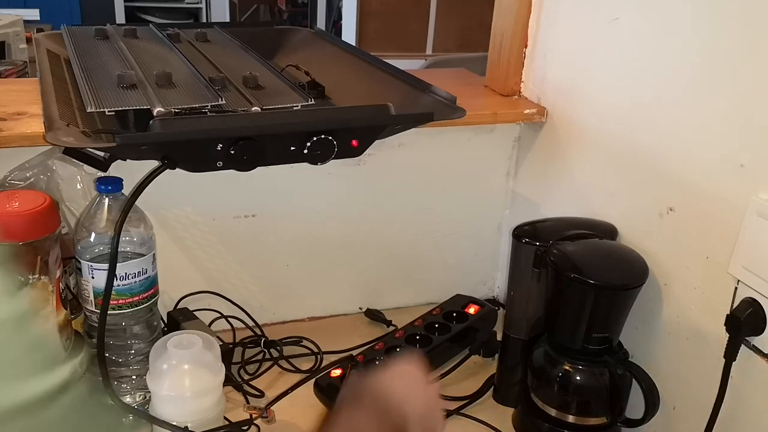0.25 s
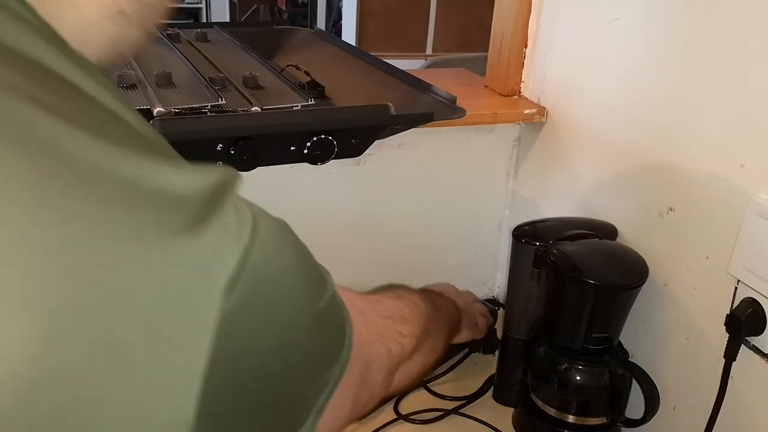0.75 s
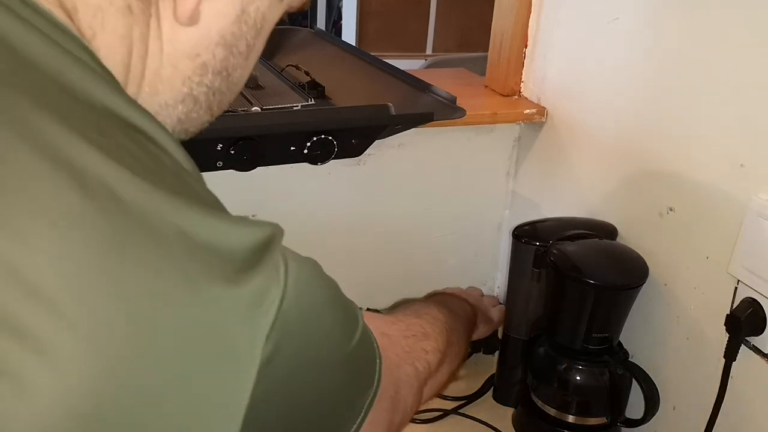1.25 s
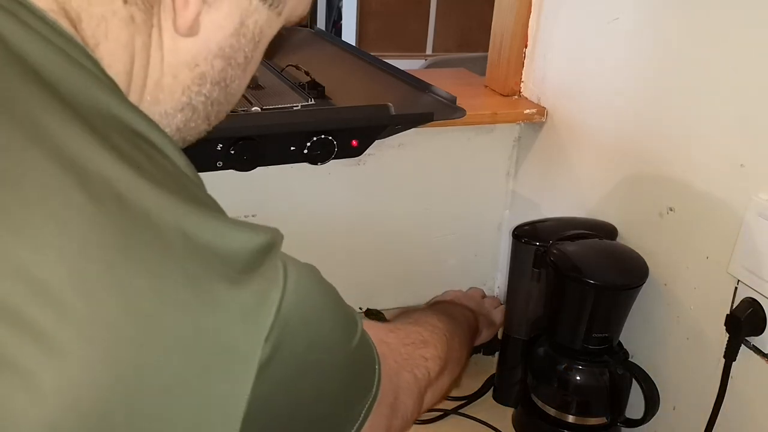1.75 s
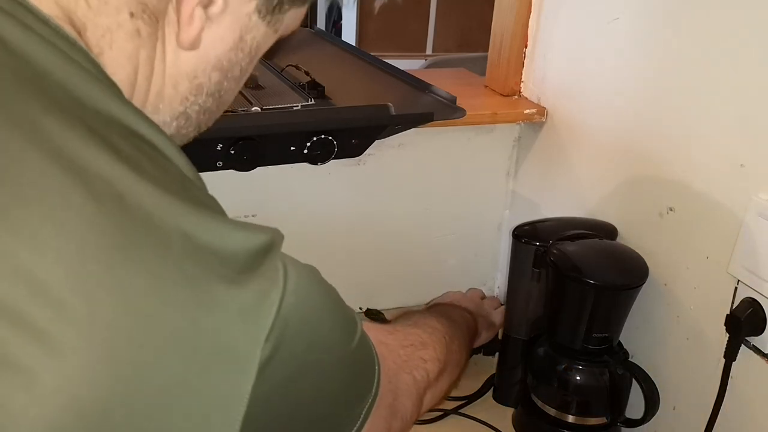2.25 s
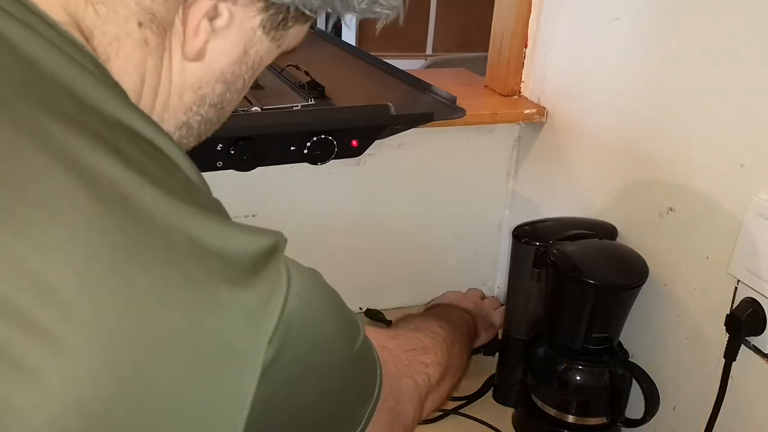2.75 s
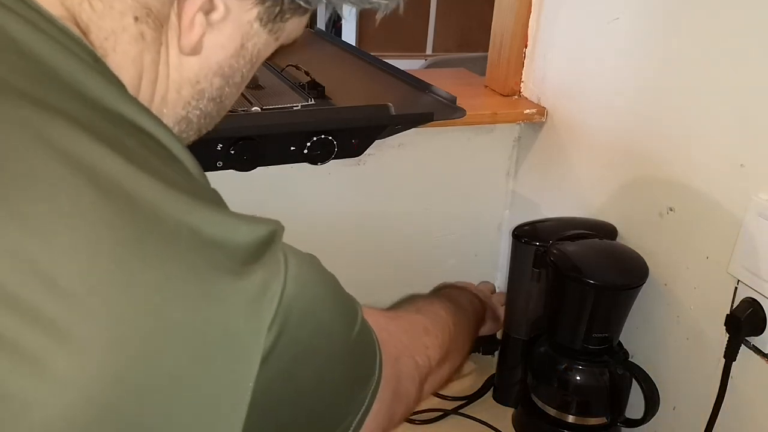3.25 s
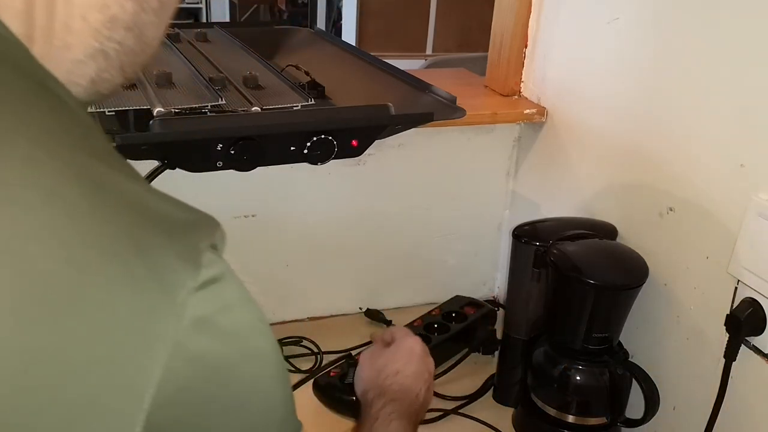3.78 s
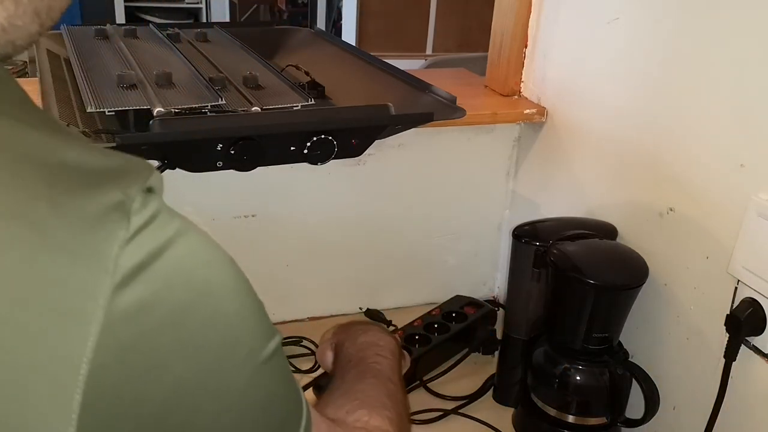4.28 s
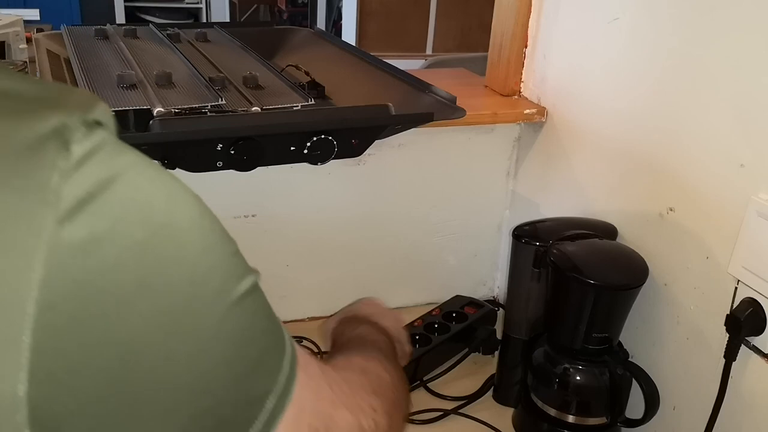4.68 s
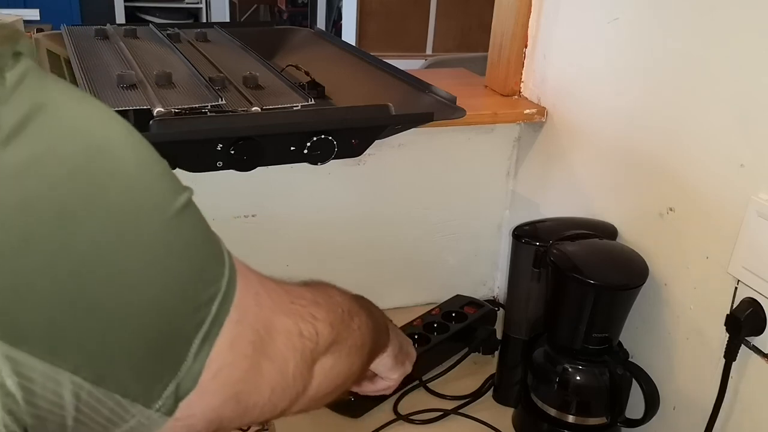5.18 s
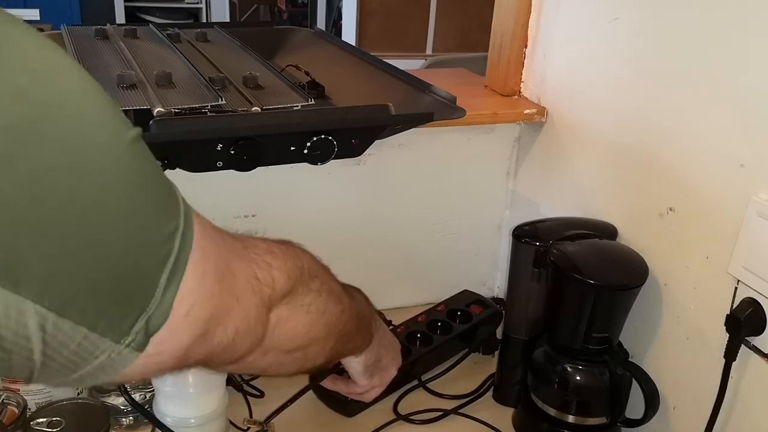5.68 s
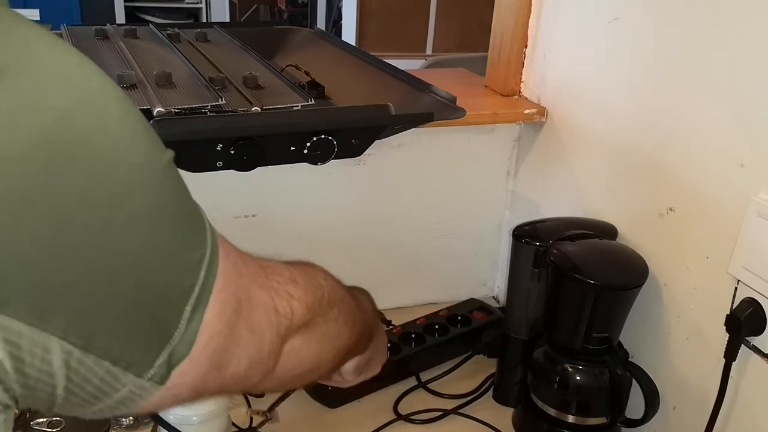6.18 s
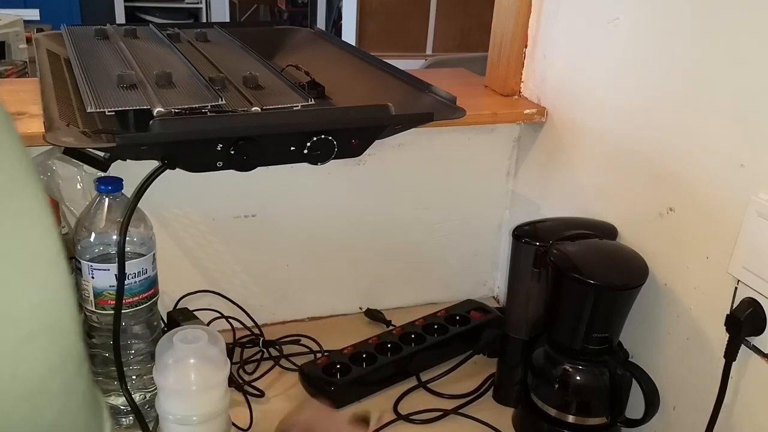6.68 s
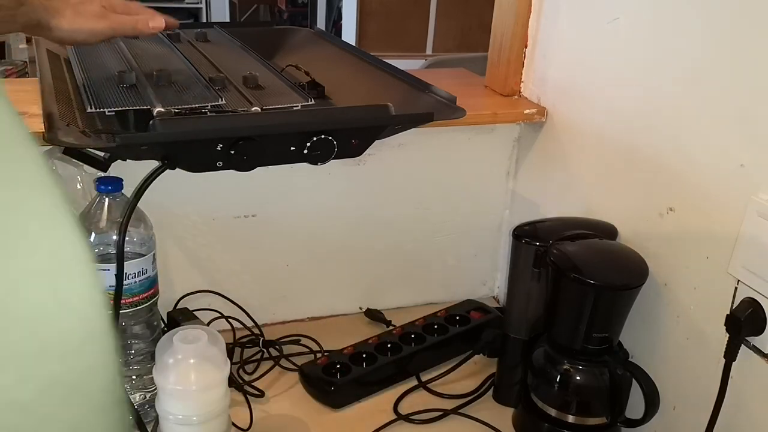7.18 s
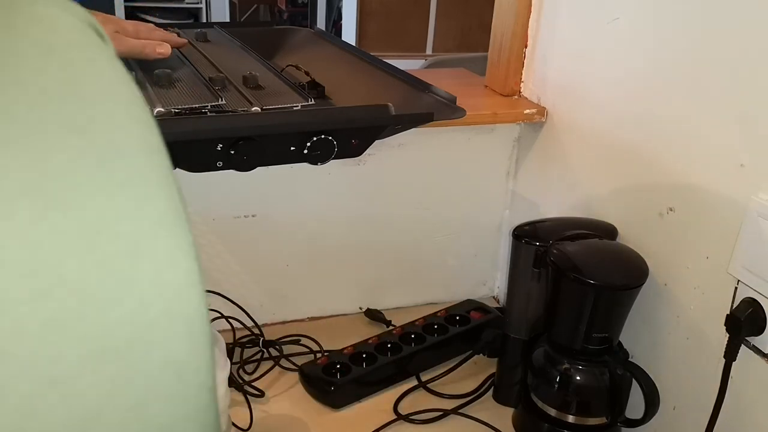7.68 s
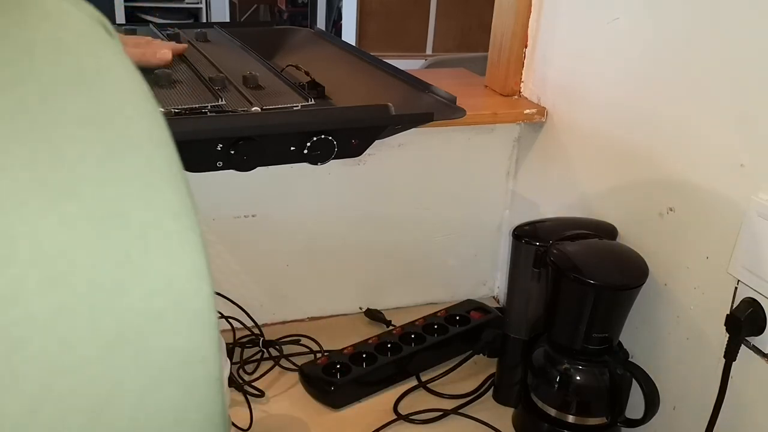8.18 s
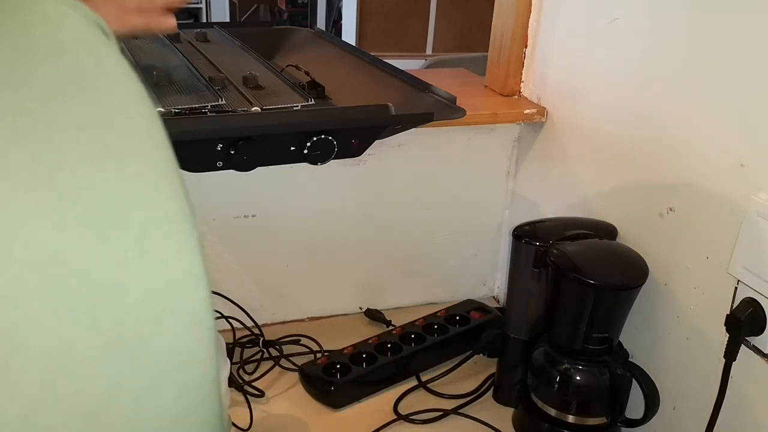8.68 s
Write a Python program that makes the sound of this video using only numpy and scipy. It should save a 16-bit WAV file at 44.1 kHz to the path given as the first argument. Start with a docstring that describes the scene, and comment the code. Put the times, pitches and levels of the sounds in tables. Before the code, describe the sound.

A heater relay ticks at once, then a hand bumps and briefly scrapes a plastic power strip on a wooden counter. After quiet ticks, a switch clicks and the plastic knocks. Softer clicks follow, then the loudest sharp snap with a woody thump. Clothes rustle, a knock sounds, and fingers lightly brush a metal grille. Close phone microphone, small lively room, faint low rumble.

```python
"""Clicks, knocks and scrapes in a quiet kitchen corner, with rustling clothes and a faint rumble. A hand works
the switches and plugs of a plastic power strip on a wooden counter; the relay of an electric heater ticks, the
hand taps the heater's case and brushes its metal grille. Each blow is shaped noise that makes a body ring.
Drags are random jerks through a resonance, cloth and hush are coloured noise, and hum is steady tones. Echoes
and a fading tail make the room; the phone's microphone port lifts the treble near 10 kHz."""
import sys
import numpy as np
from scipy import signal
from scipy.fft import rfft, irfft
from scipy.io import wavfile
from scipy.ndimage import uniform_filter1d

SR = 44100
rng = np.random.default_rng(int(sys.argv[2]) if len(sys.argv) > 2 else 0)


def unload_audio(sound):
    """Save the sound as a 16-bit wav file, at the path given as the first command line argument."""
    columns = np.transpose(np.atleast_2d(sound))
    # keep every value between -1 and 1, then stretch to whole-number steps
    steps = np.round(np.clip(columns, -1, 1) * 32767)
    wavfile.write(sys.argv[1], SR, steps.astype(np.int16))


N = 393813

# the pitch bands that make up a blow, treble to bass: low edge f/Hz, high edge f/Hz
PART_EDGES_HZ = [(10500, 14000), (7500, 10500), (5200, 7500), (3600, 5200), (2500, 3600), (1800, 2500),
                 (1250, 1800), (850, 1250), (550, 850), (350, 550), (150, 350), (70, 150)]


def undb(db):
    """Turn decibels into a gain."""
    return 10 ** (np.asarray(db) / 20)


def unit(x):
    """Scale to an average (rms) level of 1."""
    return x / np.sqrt(np.mean(x ** 2))


def band(x, lo_hz, hi_hz, order=2):
    """Keep the pitches between two limits."""
    return signal.sosfilt(signal.butter(order, [lo_hz, hi_hz], "band", fs=SR, output="sos"), x)


def ring(x, hz, width_hz):
    """One resonance, with gain 1 at its centre; the narrower it is, the longer it rings."""
    return signal.lfilter(*signal.iirpeak(hz, hz / width_hz, fs=SR), x)


def curve(rows):
    """Gain over time from (t/s, level/dB) rows, practically silent outside them."""
    s, db = np.transpose(rows)
    return undb(np.interp(np.arange(N) / SR, s, db, left=-200, right=-200))


def swells(rows):
    """Each (start, peak, end, level) row climbs from far below its level to a peak and sinks back."""
    depth_db = 30
    gain = 0
    for start, peak, end, db in rows:
        gain = gain + curve([(start, db - depth_db), (peak, db), (end, db - depth_db)])
    return gain


def noise(points):
    """Noise of rms 1, coloured by (f/Hz, level/dB) points and silent below the first."""
    hz, db = np.transpose(points)
    bins = np.fft.rfftfreq(N, 1 / SR)
    gain = undb(np.interp(np.log(bins + 1), np.log(hz), db)) * (bins > hz[0])
    return unit(irfft(rfft(rng.standard_normal(N)) * gain, N))


def walk(rate):
    """Slow random wandering: 'rate' random levels a second, held and then smoothed twice."""
    hold = int(SR / rate)
    steps = np.repeat(rng.standard_normal(N // hold + 1), hold)
    return uniform_filter1d(uniform_filter1d(steps, hold), hold)[:N]


def hush():
    """Room hush that sways a little, plus steady microphone hiss; both are coloured noise."""
    # colour of the room hush: f/Hz, level per Hz/dB (relative)
    hush_colour = [(19, -33.5), (32, -11), (71, -20), (112, -30), (146, -27.5), (255, -34.5), (280, -48.5),
                   (348, -40), (382, -38.5), (1300, -53), (1690, -87), (2860, -120)]
    # colour of the hiss: f/Hz, level per Hz/dB (relative)
    hiss_colour = [(760, -34), (1300, -1), (2710, -4), (3140, -5.5), (5480, -5.5), (11000, -4.5),
                   (16000, -9)]
    hush_db, hiss_db = -60, -78
    room_hush = undb(hush_db + 1.2 * walk(3.2)) * noise(hush_colour)
    return room_hush + undb(hiss_db) * noise(hiss_colour)


def hum():
    """Faint steady tones of an appliance: sine waves whose level wavers slightly."""
    # the tones: f/Hz, middle rms level/dB
    tones = [(148, -77), (350, -84.5)]
    t = np.arange(N) / SR
    total = 0
    for hz, db in tones:
        level = np.sqrt(2) * undb(db + walk(6.8))  # a sine peaks at root 2 times its rms
        total = total + level * np.sin(2 * np.pi * hz * t)
    return total


def rumble():
    """Air and building rumble at the lowest audible pitch: a sine with wandering pitch and level."""
    middle_hz, wander_hz = 19.9, 1.9  # the wander settings scale a random walk
    middle_db, swell_db, swells_per_s = -53.5, 7.5, 5
    phase = 2 * np.pi * np.cumsum(middle_hz + wander_hz * walk(13)) / SR
    return np.sqrt(2) * undb(middle_db + swell_db * walk(swells_per_s)) * np.sin(phase)


def rustle():
    """Cloth rubbing on cloth and skin: coloured noise that follows the movement and flutters."""
    # how loud the clothes are: t/s, level/dB
    movement = [(0, -63.5), (.55, -75), (.8, -69), (1.1, -77.5), (2.8, -84), (4.45, -79), (5.0, -82.5),
                (5.15, -75), (5.4, -78), (6.45, -78.5), (6.68, -58), (6.85, -69), (6.97, -63), (7.1, -68),
                (7.3, -65.5), (7.8, -84.5), (8.93, -82.5)]
    # colour of the cloth: f/Hz, level per Hz/dB (relative)
    cloth = [(710, -30), (1200, -6), (1520, -16.5), (2200, -9.5), (5530, -16), (9210, -1.5), (15200, -13),
             (16000, -18.5)]
    return curve(movement) * undb(2 * walk(19)) * noise(cloth)


def squeak():
    """A faint thin squeak that comes and goes: noise through a narrow resonance wavers like a tone."""
    # when it is heard: start t/s, peak t/s, end t/s, level/dB
    squeak_times = [(1.0, 1.26, 1.44, -77), (1.35, 1.62, 2.6, -81)]
    return unit(ring(rng.standard_normal(N), 2036, 40)) * swells(squeak_times)


def shuffle():
    """A hand shifting cables on the counter: dull noise with an uneven level."""
    # when they move: start t/s, peak t/s, end t/s, level/dB (an end before the start stays silent)
    shifts = [(4.5, 5.18, 5.83, -76), (5.46, 5.53, 4.3, -69), (5.62, 5.68, 5.8, -63), (5.77, 5.83, 5, -85)]
    rub = unit(band(rng.standard_normal(N), 220, 680, order=1)) * undb(8.7 * walk(30))
    return rub * swells(shifts)


def drag():
    """The strip dragged over the counter: uneven stick-slip jerks shake its hollow body."""
    # the drags: start t/s, peak t/s, end t/s, level of the ringing/dB, pitch f/Hz
    drags = [(.8, 0.833, 0.89, -32, 927), (5.85, 6.0, 6.12, -55.5, 720)]
    width_hz, slips_per_s = 130, 1500
    jerks = (rng.random(N) < slips_per_s / SR) * rng.standard_normal(N)
    slips = band(jerks, 350, 1500)
    total = 0
    for *row, hz in drags:
        shake = unit(ring(slips, hz, width_hz)) + undb(-11.5) * unit(slips)
        total = total + shake * swells([row])
    return total


def parts(snap_db, snap_hz, body_db, body_hz, thud_db):
    """Strength of each part, treble to bass: a snap on top, a hump at the body pitch, a thud below."""
    snap_fall_db = 6.5  # per octave to either side
    body_fall_db = 5.5  # one octave away, growing with the square of the distance
    thud_hz, thud_fall_db, thud_low_fall_db = 208, 8, 3.5  # falls per octave above and below
    octave = np.log2(np.prod(PART_EDGES_HZ, axis=1)) / 2  # middle of each part
    snap = snap_db - snap_fall_db * np.abs(octave - np.log2(snap_hz))
    body = body_db - body_fall_db * (octave - np.log2(body_hz)) ** 2
    above = octave - np.log2(thud_hz)
    thud = thud_db - np.maximum(thud_fall_db * above, -thud_low_fall_db * above)
    return 10 * np.log10(undb(snap) ** 2 + undb(body) ** 2 + undb(thud) ** 2)


def colour(part_db, size):
    """Filter that glides smoothly through the strength per Hz of each part and reacts without delay."""
    top_droop_db, bottom_droop_db = -8.5, -9.5  # at 16 kHz and 40 Hz, against the nearest part
    lo, hi = np.transpose(PART_EDGES_HZ[::-1])
    per_hz = part_db[::-1] - 10 * np.log10((hi - lo) / (SR / 2))
    hz = np.r_[40, np.sqrt(lo * hi), 16000]
    db = np.r_[per_hz[0] + bottom_droop_db, per_hz, per_hz[-1] + top_droop_db]
    bins = np.fft.rfftfreq(size, 1 / SR)
    log_gain = np.log(undb(np.interp(np.log(bins + 1), np.log(hz), db)))
    cepstrum = irfft(log_gain)[:size // 2]
    # folding the cepstrum gives minimum phase: the energy comes as early as it can
    return np.exp(2 * rfft(cepstrum, size) - cepstrum[0])


def contact_chatter(lasting_ms, size, rise_ms=1.3):
    """Many small contacts: one noise burst per blow, exciting all pitches about evenly."""
    ms = np.arange(size) / SR * 1000
    rise = 1 - np.exp(-(ms / rise_ms) ** 2)
    burst = rng.standard_normal((len(lasting_ms), size)) * np.exp(-ms / lasting_ms) * rise
    spectrum = rfft(burst)
    even = irfft(spectrum / np.abs(spectrum))  # same strength at every pitch
    chatter = even * np.exp(-ms / (3 * lasting_ms)) * rise
    energy = np.sum(chatter ** 2, axis=1, keepdims=True)
    return chatter / np.sqrt(energy / (lasting_ms * SR / 1000))


def blows(events, modes, size=8192):
    """Each blow is a burst of chatter, weighted from snap to thud; it also sets the body ringing."""
    thud_lag_s, thud_top_hz = .012, 252.3  # the bass of a blow blooms late
    events = np.array(events)
    chatter = contact_chatter(np.clip(events[:, -2:-1], .5, 60), size)
    bins = np.fft.rfftfreq(size, 1 / SR)
    late = np.exp(-2j * np.pi * thud_lag_s * thud_top_hz * np.arctan(bins / thud_top_hz))
    contact, push = np.zeros((2, N + size))
    for (s, *strength, _, ring_db), shake in zip(events, chatter):
        hit = irfft(rfft(shake) * colour(parts(*strength), size) * late)
        start = int(s * SR)
        contact[start:start + size] += hit
        push[start:start + size] += undb(ring_db) * hit
    ringing = sum(undb(db) * ring(push, hz, width) for hz, width, db in modes)
    return undb(-14) * (contact + ringing)[:N]


def grille():
    """The hand brushes the heater's metal grille: a few close blows ring its thin bars."""
    # blows: t/s, snap level/dB, snap f/Hz, body level/dB, body f/Hz, thud level/dB, chatter/ms, ring level/dB
    # (levels before the common 14 dB cut in blows)
    brushes = [(8.268, -53.5, 7000, -59, 1176, -62, 27.45, -2),
               (8.277, -52.5, 9500, -48, 850, -46, 28.5, -1.8),
               (8.312, -49, 4360, -43.5, 944, -47.5, 31.7, -2.2),
               (8.345, -54.5, 4500, -51.5, 950, -49, 60.8, .4)]
    # what rings: f/Hz, width/Hz, level over the broad sound/dB
    grille_modes = [(205, 12, 10), (662, 11, 15), (1850, 20, 9), (2250, 14, 10), (3140, 20, 8),
                    (4110, 10, 17), (4250, 14, 13), (4700, 16, 10), (5740, 16, 9), (6420, 12, 15),
                    (8020, 16, 12), (8980, 20, 12), (9320, 20, 10), (11500, 25, 8)]
    return blows(brushes, grille_modes)


def heater():
    """The heater's relay ticks and a hand taps its case once: small blows ring its housing."""
    # blows: t/s, snap level/dB, snap f/Hz, body level/dB, body f/Hz, thud level/dB, chatter/ms, ring level/dB
    # (levels before the common 14 dB cut in blows)
    ticks = [(.027, -37, 12000, -41.5, 2340, -46.5, 10, -3), (1.2444, -66, 9050, -62.5, 700, -79, 27, -18),
             (1.336, -45.5, 6660, -43, 760, -82, 19, 3), (1.82, -67, 10500, -74, 3000, -81, 11, -7),
             (2.997, -46.5, 7360, -46.5, 3300, -43, 3.2, -21),
             (7.222, -40.5, 6830, -43, 1700, -59, 27, -16)]
    # what rings: f/Hz, width/Hz, level over the broad sound/dB
    heater_modes = [(657, 30, 9), (2650, 60, 6), (4290, 60, 5), (6460, 90, 11), (7000, 90, 12),
                    (9850, 60, 8), (10150, 70, 9), (11300, 200, 7)]
    return blows(ticks, heater_modes)


def bumps():
    """Bumps of the strip and its plugs: blows with dull, broad resonances."""
    # blows: t/s, snap level/dB, snap f/Hz, body level/dB, body f/Hz, thud level/dB, chatter/ms, ring level/dB
    # (levels before the common 14 dB cut in blows; chatter held to 60 ms at most)
    knocks = [(.702, -67, 9500, -53.5, 1610, -61, 4.1, -24), (.817, -47.5, 9500, -29.5, 950, -60, 5.8, -7),
              (.835, -39.5, 6700, -32.5, 2270, -40, 4.8, 1),
              (3.030, -57, 8000, -38.5, 1160, -40.5, 12, -6.5),
              (3.3555, -56, 5000, -46.5, 1690, -46, 14.5, -20),
              (3.4257, -34, 8150, -32, 1450, -22.5, 9.7, -2.5), (4.163, -81, 5000, -60, 610, -56, 22, -13),
              (4.660, -76, 9000, -53.5, 1010, -44, 11, -6.5),
              (5.538, -79, 10000, -61, 960, -58.5, 9.4, -6.5),
              (5.620, -55, 7900, -45.5, 756, -34.5, 6.5, -6.5),
              (5.9726, -70.5, 10000, -56.5, 750, -57.5, 72, -10),
              (6.1245, -19, 9500, -14.5, 753.3, -14, 11, -11),
              (6.5445, -57, 8000, -43, 852, -52, 8.1, -2.5), (6.669, -51.5, 8060, -53, 735, -54.5, 7.6, -9),
              (7.029, -71.5, 10260, -67, 894, -48, 8.2, -4),
              (7.0995, -62, 10100, -55.5, 737, -46, 8.7, -13),
              (7.3345, -35.5, 8000, -18.5, 1280, -28, 8.5, -4)]
    # what rings: f/Hz, width/Hz, level over the broad sound/dB
    bump_modes = [(593, 100, 12.8), (637, 40, 1.3), (934.4, 64, 8.3), (1280, 80, 1.3), (8650, 190, 1.1)]
    return blows(knocks, bump_modes)


def switches():
    """The strip's switches click: snappy blows ring the plastic."""
    # blows: t/s, snap level/dB, snap f/Hz, body level/dB, body f/Hz, thud level/dB, chatter/ms, ring level/dB
    # (levels before the common 14 dB cut in blows)
    clicks = [(2.9375, -63, 9500, -72.5, 840, -44, 8.1, -9),
              (3.065, -21, 11800, -23.5, 1250, -62, 3.85, -10.5),
              (4.209, -86, 9000, -65, 1970, -66, 19, -6), (4.389, -79, 8000, -65, 1800, -53, 8.1, -13),
              (4.414, -63.5, 10000, -65, 1700, -64, 9.6, -17), (4.510, -65, 9000, -50.5, 1500, -67, 18, -5),
              (4.518, -25, 7500, -31.5, 2640, -38.5, 5.5, -4),
              (5.819, -77, 10000, -60.5, 1550, -62.5, 2.4, 2),
              (6.037, -50, 11000, -44, 741, -56, 4.1, -6.5), (6.057, -44, 10500, -42, 900, -47.5, 8.8, -8),
              (6.075, -26.5, 9500, -20.5, 1608, -40, 4.5, -9.5),
              (6.0965, -11, 10500, -15, 2684, -25.5, 11, -10.5),
              (6.755, -44.5, 6000, -45.5, 646, -41, 3.2, -9.5)]
    # what rings: f/Hz, width/Hz, level over the broad sound/dB
    switch_modes = [(1650, 22, 17), (2060, 50, 10), (2800, 150, 4), (3450, 60, 7), (5710, 45, 12),
                    (9030, 80, 6), (12000, 80, 7)]
    return blows(clicks, switch_modes)


def fade(t, t60):
    """Exponential fade by 60 dB in t60 seconds, scaled to the same energy for any length."""
    return np.exp(-np.log(1000) * t / t60) / np.sqrt(t60 * SR / (2 * np.log(1000)))


def room(x, size=36000):
    """Direct sound, quick dense echoes off shelf, wall and counter, and a tail that fades by octave."""
    # the tail by octave: centre f/Hz, time to fade by 60 dB t/s, level/dB (before the octave is cut out)
    tail = [(91, 0.89, -9.5), (180, 0.69, -7.5), (343, 0.56, -2.5), (718.5, 0.37, -0.5), (1350, 0.47, -4.5),
            (2740, 0.58, -6), (5438, .42, -3.5), (11200, 0.49, -5)]
    corner_t60_s, corner_db = .12, 1
    t = np.arange(size) / SR
    response = undb(corner_db) * rng.standard_normal(size) * fade(t, corner_t60_s)
    build_up = 1 - np.exp(-t / 0.0083)
    for hz, t60, db in tail:
        octave = band(rng.standard_normal(size), hz / np.sqrt(2), hz * np.sqrt(2))
        response += undb(db) * octave * fade(t, t60) * build_up
    response[0] = 1  # direct sound
    return signal.fftconvolve(x, response)[:N]


def standing_waves(x):
    """Low pitches that fit between the walls boom on as narrow resonances."""
    # the waves: f/Hz, width/Hz, level/dB
    boom = [(91.4, 1.6, 18), (177, 6.4, 13), (225, 7, 17)]
    return sum(undb(db) * ring(x, hz, width) for hz, width, db in boom)


def microphone_port(x):
    """The air in the phone's port resonates and lifts the treble by 9 dB at 9.8 kHz."""
    return x + (undb(9) - 1) * ring(x, 9800, 3000)


def scene():
    """Blows and drags sound through room and port; the other sounds are added directly."""
    background = hush() + hum() + rumble() + rustle()
    handling = squeak() + shuffle()
    struck = grille() + heater() + bumps() + switches()
    source = struck + drag()
    near = microphone_port(room(source) + standing_waves(source))
    return (near + handling + background)[None]


def record(dry):
    """The phone cuts the treble steeply above 15.9 kHz."""
    return signal.sosfilt(signal.ellip(10, .2, 60, 15900, fs=SR, output="sos"), dry)


dry = scene()
out = record(dry)
unload_audio(out)
```